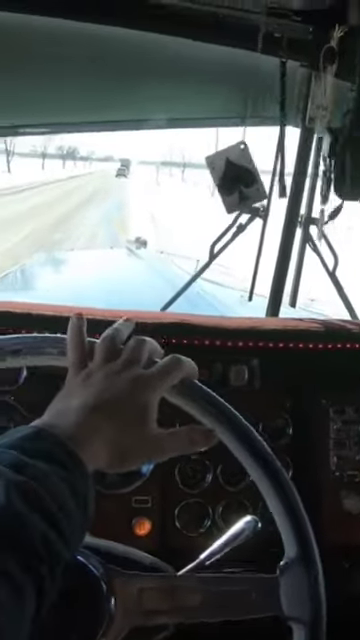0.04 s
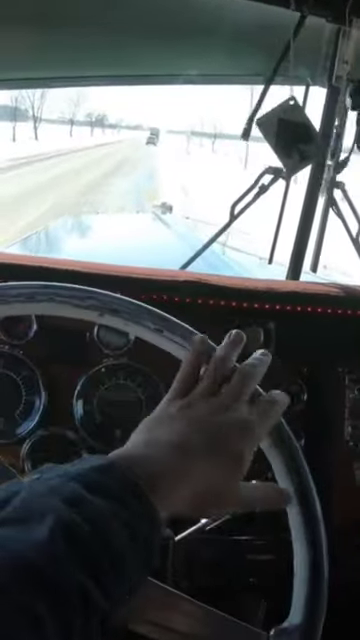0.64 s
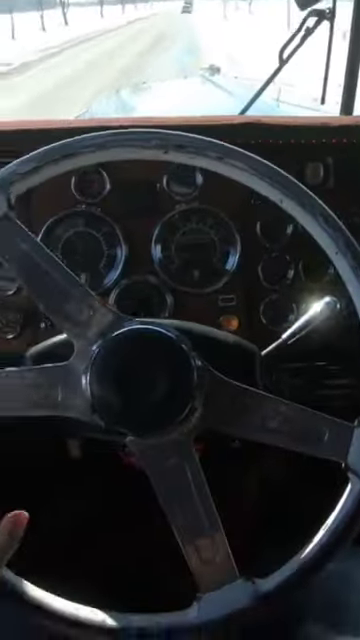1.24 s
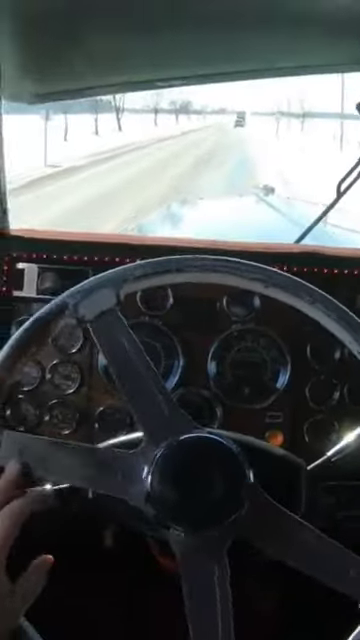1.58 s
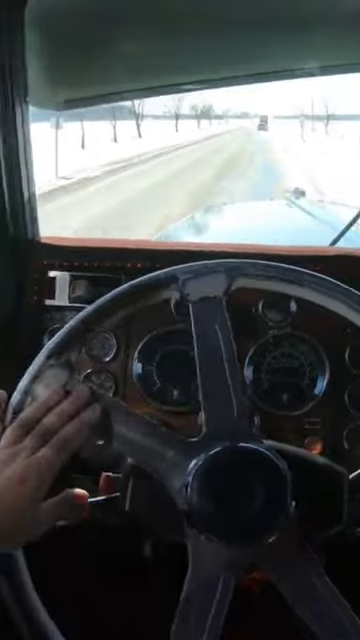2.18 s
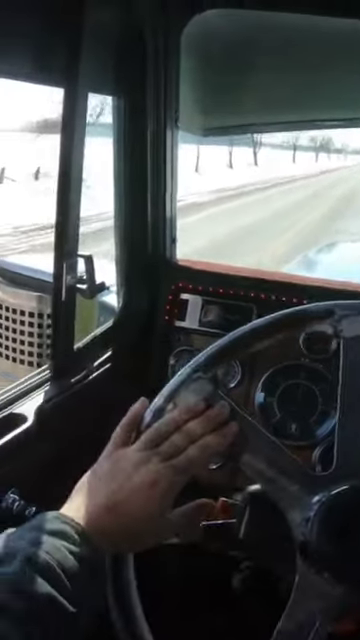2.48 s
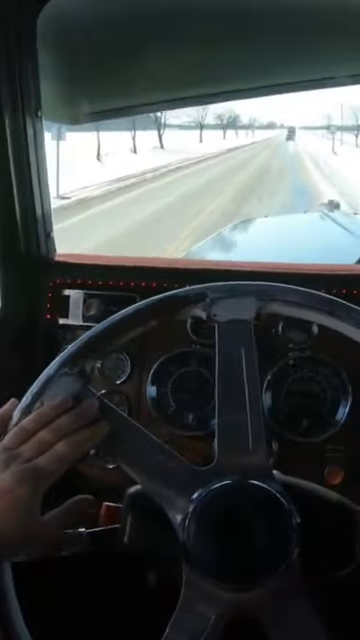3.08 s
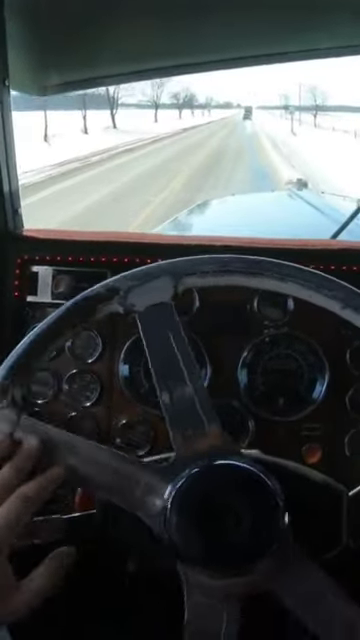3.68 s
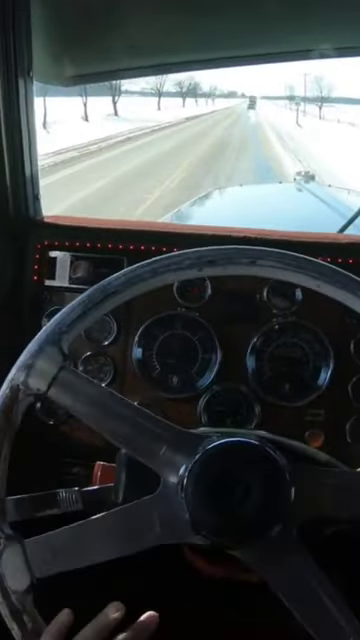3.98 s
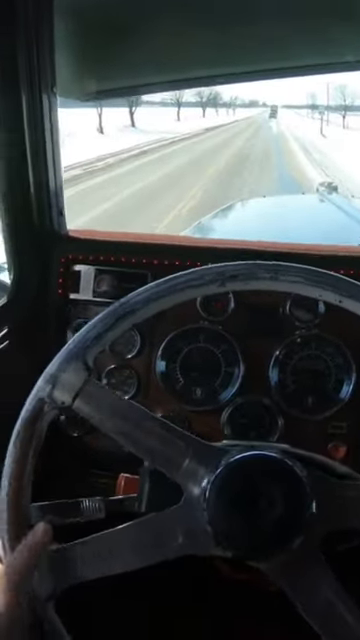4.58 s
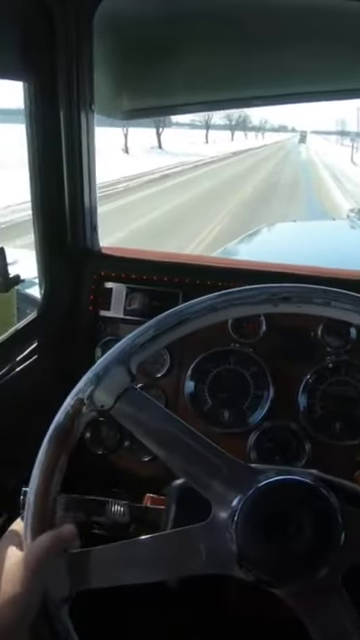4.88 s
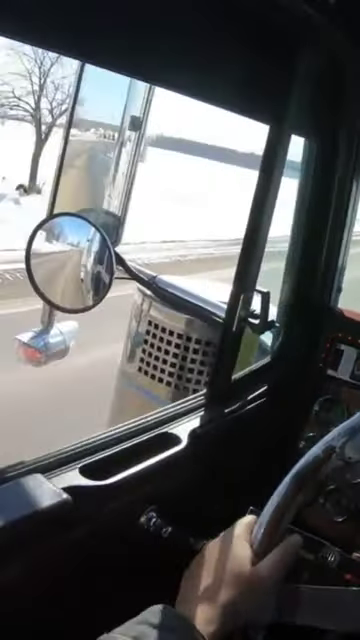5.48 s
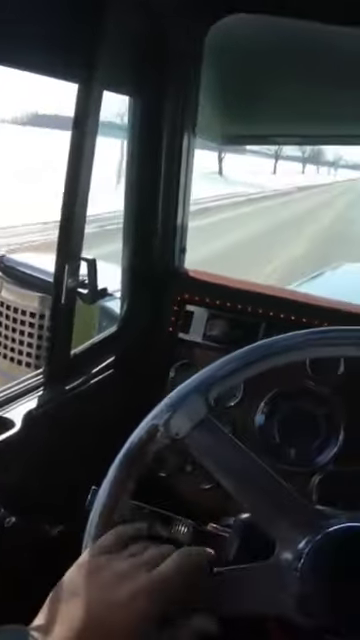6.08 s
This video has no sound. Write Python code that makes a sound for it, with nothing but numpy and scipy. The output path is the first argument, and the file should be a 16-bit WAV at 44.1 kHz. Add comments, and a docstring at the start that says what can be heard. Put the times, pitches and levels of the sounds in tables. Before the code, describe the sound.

Loud, low diesel engine and exhaust drone inside a moving heavy truck, revving, easing off and pulling again with a whistling turbo.

```python
"""Inside the cab of a heavy truck on a winter road, a six-cylinder turbo diesel pulls, runs up,
eases off and pulls again. The exhaust drones at the firing rate, uneven cylinders shake the cab,
and combustion clatters through the firewall, coloured by the resonances of the cab's air and panels.
The turbo whistles over rushing intake air and tyre noise, and loose dash panels buzz.
Something small, perhaps a control lever, clicks once."""
import sys
import numpy as np
from scipy import signal
from scipy.fft import rfft, irfft, next_fast_len
from scipy.io import wavfile
from scipy.ndimage import uniform_filter1d

SR = 44100
rng = np.random.default_rng(int(sys.argv[2]) if len(sys.argv) > 2 else 0)


def transcribe(u):
    """Save the signal u as a 16-bit wav file named by the first command-line argument.

    u: samples, shape (n,) or (channels, n), limited to [-1, 1]; the rate is SR.
    q: integer samples, one column per channel.
    """
    v = np.clip(np.atleast_2d(u).T, -1, 1)
    q = np.round(v * 32767).astype(np.int16)
    wavfile.write(sys.argv[1], SR, q)


N = 279594
TIME = np.arange(N) / SR
PADDED = next_fast_len(N + 8192)
BIN_HZ = np.maximum(np.arange(PADDED // 2 + 1) * SR / PADDED, 1)
CYLINDERS = 6


def from_db(db):
    """Decibels to amplitude ratio."""
    return 10 ** (np.asarray(db) / 20)


def rms_one(x):
    """Normalisation to an rms of 1."""
    return x / np.sqrt(np.mean(x ** 2) + 1e-20)


def in_time(curve):
    """Linear interpolation of a curve at every sample."""
    return np.interp(TIME, *np.transpose(curve))


def at_hz(points, hz):
    """Interpolation on a log-frequency axis."""
    known_hz, values = np.transpose(points)
    return np.interp(np.log(hz), np.log(known_hz), values)


def ramp(x, start, length):
    """Linear rise from 0 to 1."""
    return np.clip((x - start) / length, 0, 1)


def drift(rate_hz, step=40):
    """Low-passed noise: a random fluctuation of rms 1."""
    pole = np.exp(-2 * np.pi * step * rate_hz / SR)
    noise = rng.standard_normal(N // step + 2002)
    slow = signal.lfilter([1], [1, -2 * pole, pole * pole], noise)[2000:]
    return np.interp(np.arange(N) / step, np.arange(len(slow)), rms_one(slow))


def white():
    """Two uncorrelated white noises."""
    return rng.standard_normal((2, N))


def breathy_tone(angle, spread_hz, flicker_hz=92.0):
    """Line broadening: random modulation smears a tone into a narrow hiss at each microphone."""
    ears = [np.cos(angle + 2 * np.pi * np.cumsum(spread_hz * drift(200)) / SR) * drift(flicker_hz)
            for ear in range(2)]
    return rms_one(np.array(ears))


def fluttering_tone(angle):
    """Cab reflections give a tone its own flutter of level and phase at each microphone."""
    ears = [from_db(2.6 * drift(24)) * np.cos(angle + 0.7 * drift(30)) for ear in range(2)]
    return rms_one(np.array(ears))


# Modes of the cab's air and panels. Each row: frequency in Hz, bandwidth in Hz, peak in dB.
CAB_RESONANCES = [(332.6, 12, 2.5), (420, 27, 5), (508, 15, 2.5), (562, 20, 4), (625, 41, 6), (694, 23, 5),
                  (718.6, 29, 5.5), (780, 53, 5.5), (861, 18, 5), (909.4, 26, 5.5), (1051, 30, 4),
                  (1220, 110, 5), (1351, 22, 7.5), (1433, 14, 4.5), (1685, 24, 5), (1896, 54, 4),
                  (2260, 72, 3), (2400, 70, 3.5), (2530, 40, 3), (2680, 45, 3), (2850, 36, 4),
                  (3125, 66, 4.5), (3540, 500, 2.5), (3690, 170, 2.5), (4480, 180, 0.5), (5750, 99, 1),
                  (6520, 280, 2.5)]
CAB_DB = sum(db / (1 + (2 * (BIN_HZ - hz) / width) ** 2) for hz, width, db in CAB_RESONANCES)
# Likeness of the two microphones. Each row: frequency in Hz, correlation before clipping to 0-1.
MIC_CORRELATION = [(30, -3), (150, 0), (300, 1.14), (500, 0.7), (800, 0.5), (1300, 0.3), (2500, 0.42),
                   (4000, 1.1), (6000, 0.07), (10000, .5)]
# Their balance. Each row: frequency in Hz, left minus right in dB.
MIC_BALANCE = [(30, 2.5), (180, 3), (350, 1.5), (700, -2), (1300, 5.5), (2500, 2), (5000, 3), (9000, 1.5)]

def through_cab(pair, spectrum):
    """Source and filter: a spectrum and the cab's modes shape two signals into stereo of mid rms 1."""
    roll_off = (np.minimum(BIN_HZ / spectrum[0][0], 1) * np.minimum(spectrum[-1][0] / BIN_HZ, 1)) ** 4
    mid, side = rfft(pair, PADDED) * from_db(at_hz(spectrum, BIN_HZ) + CAB_DB) * roll_off
    alike = np.clip(at_hz(MIC_CORRELATION, BIN_HZ), 0, 0.999)
    sides = np.array([[1], [-1]])
    ears = np.sqrt(1 + alike) * mid + sides * np.sqrt(1 - alike) * side
    ears *= from_db(sides * at_hz(MIC_BALANCE, BIN_HZ) / 2)
    out = irfft(ears, PADDED)[:, :N]
    return out / out.mean(axis=0).std()


# The driver lifts off the pedal. Each row: lift in seconds, next press in seconds.
PEDAL_LIFTS = [(-1, 0.25), (2.5, 3.4)]

def off_throttle(onset_s, return_s):
    """Lagging response to the pedal: 0 while pulling, ramping to 1 after a lift."""
    return sum(ramp(TIME, lift, onset_s) * (1 - ramp(TIME, press, return_s))
               for lift, press in PEDAL_LIFTS)


def level_from_law(law, revs, boost, released, push_db):
    """Gains multiply, so each part of the engine's state adds its share in dB."""
    lugging_db, revs_db, boost_db, released_db, follows = law
    return lugging_db + revs_db * revs + boost_db * boost + released_db * released + follows * push_db


def cycle_vibration(cycles, fresh, size=4096):
    """Periodic vibration: the block repeats a jagged wave each cycle; a fresh share of power is noise."""
    patterns = irfft(np.exp(2j * np.pi * rng.random((2, size // 2 + 1))))
    repeated = np.array([np.interp(cycles % 1 * size, np.arange(size), p) for p in patterns])
    return np.sqrt(1 - fresh) * rms_one(repeated) + np.sqrt(fresh) * white()


def firing_throb(cycles, depth_db, uneven_db):
    """Amplitude modulation: a swell with each firing, stronger on one side of the crank turn."""
    angle = 2 * np.pi * cycles
    return rms_one(from_db(depth_db * np.cos(CYLINDERS * angle) + uneven_db * np.cos(2 * angle)))


def engine_orders(cycles, firing_hz, orders, response_db, jitter_rad, swell_db):
    """Unequal cylinders excite harmonics of the cycle rate; each swells as it crosses a resonance."""
    out = np.zeros(N)
    for order, level_db in orders:
        cab_db = np.interp(round(order) * firing_hz / CYLINDERS, BIN_HZ, response_db)
        angle = 2 * np.pi * (round(order) * cycles + rng.random()) + jitter_rad * drift(6.6)
        out += from_db(level_db + cab_db + swell_db * drift(2.5)) * np.cos(angle)
    return np.sqrt(2) * out


# Tyre noise. Each row: frequency in Hz, relative spectral density in dB.
TYRE_SPECTRUM = [(150, -2), (290, 4), (360, -4), (440, -0.5), (560, -12.5), (800, -12.5), (1200, -21.5),
                 (2000, -26.5)]

def tyres():
    """Rolling noise: steady, broadband and filtered by the cab."""
    return from_db(-50.5) * through_cab(white(), TYRE_SPECTRUM)


# Road rumble. Each row: frequency in Hz, relative spectral density in dB.
RUMBLE_SPECTRUM = [(8, -14), (15, 2.5), (24, 0.5), (36, -14), (50, -0.5), (70, -2), (115, -8.5),
                   (150, -13.5), (200, -25), (300, -48.5)]

def road_rumble(shake_db):
    """Long waves reach both microphones in phase, so the rumble is a single signal."""
    return from_db(-20.5 + 0.35 * shake_db) * through_cab(white(), RUMBLE_SPECTRUM).mean(axis=0)


# The click. Each row: time in seconds, level in dB.
LEVER_CLICKS = [(4.926, -44)]

def lever(ring_s=0.009):
    """Damped ringing: a bright burst of noise decays exponentially."""
    burst = sum(from_db(db) * (TIME >= s) * np.exp(-np.abs(TIME - s) / ring_s) for s, db in LEVER_CLICKS)
    spectrum = [(2000, 13), (5200, 0.5), (6000, 3), (6600, 14), (7500, -12), (11000, -18), (14000, -24)]
    return burst * through_cab(white(), spectrum)


# Rushing air. Each row: frequency in Hz, relative spectral density in dB.
INTAKE_SPECTRUM = [(900, -5), (1600, -0.5), (2100, -0.5), (2500, -0.5), (3100, -1), (3900, -0.5),
                   (4300, -5.5), (5000, -7), (5900, -2), (6600, -7.5), (7500, -10.5), (8500, -19.5),
                   (10500, -26.5), (14000, -44.5)]
# Its slow swell. Each row: time in seconds, gain in dB.
INTAKE_SWELL = [(0, 2), (2.6, -1.5), (3.2, 1), (3.9, 3), (5.4, -1.6), (5.85, 0), (6.15, -3)]
# Its level in dB: base, then gain at full revs, per octave of boost, off throttle, per dB of push.
INTAKE_LAW = (-59.5, 7.5, 15.5, 5.5, 0.33)

def intake_air(cycles, revs, boost, spun_down, push_db):
    """Flow noise: a broad hiss that grows with turbo speed and pulses faintly with the firings."""
    level_db = level_from_law(INTAKE_LAW, revs * (1 - spun_down), boost, spun_down, push_db)
    flow = white() * firing_throb(cycles, depth_db=0.45, uneven_db=0.5)
    return from_db(level_db + in_time(INTAKE_SWELL)) * through_cab(flow, INTAKE_SPECTRUM)


# The whistle swells and fades. Each row: time in seconds, level in dB.
WHISTLE_LEVEL = [(0, -57), (0.17, -47), (0.32, -67), (1.3, -74), (1.47, -59), (1.53, -64), (1.58, -56),
                 (1.67, -65), (1.75, -51), (1.86, -65), (2.6, -74), (2.8, -62), (3.13, -68), (3.27, -54),
                 (3.37, -62), (3.49, -51), (3.61, -49), (3.74, -63), (3.95, -71), (4.45, -59), (4.55, -61),
                 (4.67, -50), (4.79, -61), (5.1, -70), (5.66, -61), (5.85, -69), (6.12, -58), (6.34, -54)]
# The turbo's two air noises. Each row: frequency in Hz, relative spectral density in dB.
RUN_DOWN_SPECTRUM = [(1900, -13.5), (2250, 1), (2430, 5.5), (2600, -4.5), (2950, -1.5), (3200, -13.5),
                     (3700, -0.5), (4300, -18)]
BOOST_SPECTRUM = [(4500, -5), (6400, 2), (8000, -5), (10500, -15), (14000, -24.5)]

def turbo(whistle_hz, spun_down):
    """Rotor harmonics: a whistle at twice the shaft rate and, off throttle, a whine at three times."""
    level_db = in_time(WHISTLE_LEVEL)
    shaft = np.pi * np.cumsum(whistle_hz + 10 * drift(45)) / SR
    whistle = from_db(level_db) * fluttering_tone(2 * shaft)
    whistle += from_db(-67 + 3 * spun_down) * breathy_tone(2 * shaft, spread_hz=82.0)
    whine = from_db(level_db - 11) * fluttering_tone(3 * shaft)
    whine += from_db(-64) * breathy_tone(3 * shaft, spread_hz=120.0)
    whine *= off_throttle(onset_s=0.38, return_s=0.2)
    hollow_hiss = from_db(-61.5) * spun_down * through_cab(white(), RUN_DOWN_SPECTRUM)
    speed_ratio = whistle_hz / whistle_hz.max()
    high_hiss = from_db(-58 + 105 * np.log10(speed_ratio)) * through_cab(white(), BOOST_SPECTRUM)
    return (whistle + whine + hollow_hiss) * from_db([[1.0], [-1.0]]) + high_hiss


# Loose panels. Each row: pitch in Hz, wander in Hz, dB relative to effort, dB added at full revs.
DASH_PANELS = [(1353, 12, -18.5, 3), (1695, 10, -25, 2.5)]
# A brief harder buzz. Each row: centre in seconds, half-width in seconds, peak level in dB.
DASH_FLARES = [(6.15, 0.069, -46)]
# Rattle of dash and firewall. Each row: frequency in Hz, relative spectral density in dB.
RATTLE_SPECTRUM = [(1050, -11), (1330, -2), (1450, -6), (1750, -5), (2000, -18.5)]

def dash(effort_db, revs, flutter_db=0.5):
    """Forced vibration: loose panels buzz fitfully with the engine and once flare into a rattle."""
    panels = 0
    for hz, wander_hz, level_db, revs_db in DASH_PANELS:
        angle = 2 * np.pi * np.cumsum(hz + wander_hz * drift(5)) / SR
        buzz = breathy_tone(angle, spread_hz=8.0, flicker_hz=20.0)
        panels += from_db(effort_db + level_db + revs_db * revs + flutter_db * drift(3)) * buzz
    flare = sum(from_db(db) * np.exp(-((TIME - s) / width) ** 2) for s, width, db in DASH_FLARES)
    return panels * from_db([[2.0], [-2.0]]) + flare * through_cab(white(), RATTLE_SPECTRUM)


# Tones of the growl. Each row: multiple of the cycle rate, relative level in dB.
GROWL_HARMONICS = [(15, -13), (16, -7), (17, -12), (18, -4.5), (20, -8.5), (21, -19.5), (22, -9), (24, -17),
                   (26, -11), (27, -24.5), (28, -17.5), (30, -17.5), (32, -21.5), (36, -19.5)]
# Its drive in dB: base, then gain at full revs, per octave of boost, off throttle, per dB of push.
GROWL_DRIVE_LAW = (-41, 3.2, 4, 2.5, 1.11)
# Its rough part. Each row: frequency in Hz, relative spectral density in dB.
GROWL_SPECTRUM = [(140, -12.5), (175, -0.5), (230, -4.5), (290, -6), (325, -5.5), (370, -12.5), (440, -9.5),
                  (490, -11.5), (550, -18), (800, -37.5)]

def engine_growl(cycles, firing_hz, revs, boost, released, push_db):
    """Block vibration excites the cab's modes; returns mono harmonics and a rough stereo band."""
    drive_db = level_from_law(GROWL_DRIVE_LAW, revs, boost, released, push_db)
    tones = engine_orders(cycles, firing_hz, GROWL_HARMONICS, CAB_DB, jitter_rad=0.39, swell_db=2.5)
    tones *= from_db(drive_db - 2 - 1.1 * revs - 6.3 * released)
    rough = from_db(drive_db - 7) * through_cab(cycle_vibration(cycles, fresh=0.72), GROWL_SPECTRUM)
    return tones, rough


# The coasting drivetrain. Each row: frequency in Hz, relative spectral density in dB.
DRIVETRAIN_SPECTRUM = [(240, -9.5), (285, 7), (315, 8.5), (375, -23.5), (450, -2), (520, -12)]

def drivetrain(released):
    """Band-limited noise: the drivetrain growls roughly off the throttle."""
    return from_db(-45.5) * released * through_cab(white(), DRIVETRAIN_SPECTRUM)


# Roar under load. Each row: frequency in Hz, relative spectral density in dB.
ROAR_SPECTRUM = [(570, -18.5), (630, -4), (690, -4.5), (780, -2.5), (870, 1.5), (950, -4.5), (1050, -16)]

def load_roar(cycles, effort_db, revs, spun_down, push_db):
    """Vibration modulated at the firing rate: a midrange roar that grows with speed and load."""
    vibration = cycle_vibration(cycles, fresh=0.37) * firing_throb(cycles, depth_db=2.5, uneven_db=1.0)
    level_db = effort_db - 7 + 3.5 * revs ** 2 + 0.3 * push_db - 12 * spun_down ** 2
    return from_db(level_db) * through_cab(vibration, ROAR_SPECTRUM)


# Combustion knock. Each row: frequency in Hz, relative spectral density in dB.
CLATTER_SPECTRUM = [(300, -13.5), (450, -2.5), (540, -6.5), (700, -2), (900, 1), (1000, -3.5), (1150, -7),
                    (1300, -16), (1480, -15), (1750, -17), (2100, -15), (3000, -21), (5000, -38)]

def combustion_clatter(cycles, effort_db, revs, released):
    """Transmission through the firewall: the knocks grow more periodic and brighter with speed."""
    knocks = cycle_vibration(cycles, fresh=0.7 - 0.63 * revs)
    knocks *= firing_throb(cycles, depth_db=1.0, uneven_db=-1.0)
    clatter = from_db(effort_db - 1 - 0.74 * revs - released) * through_cab(knocks, CLATTER_SPECTRUM)
    rattle = from_db(effort_db - 16.5 + 3.6 * revs) * through_cab(knocks, RATTLE_SPECTRUM)
    return clatter + rattle


# Pushes of the uneven cylinders. Each row: multiple of the cycle rate, relative level in dB.
SHAKE_HARMONICS = [(1, -6.5), (2, -7.5), (3, -4), (4, -8), (5, -8.5), (7, -14.5), (8, -9.5), (10, -6),
                   (11, -20), (13, -21), (14, -12)]
# How readily the cab rocks. Each row: frequency in Hz, gain in dB.
ROCKING_RESPONSE = [(20, -6.5), (28, 3), (37, -1), (42, -0.5), (48, 1), (55, 1.5), (68, 0), (88, -3.5),
                    (96, -10), (100, 5.5), (108, 0), (114, -7), (121, 1), (132, 0.5), (150, -2)]

def cab_shake(cycles, firing_hz, shake_db, top_hz=174):
    """Inertia as a low-pass filter: the rocking cab is too heavy to follow the fastest pushes."""
    response_db = at_hz(ROCKING_RESPONSE, BIN_HZ)
    pushes = engine_orders(cycles, firing_hz, SHAKE_HARMONICS, response_db, jitter_rad=0.7, swell_db=2.0)
    return from_db(shake_db + 1) * signal.sosfilt(signal.butter(8, top_hz, fs=SR, output="sos"), pushes)


# Exhaust tones. Each row: multiple of the cycle rate, base level in dB, then dB added
# at full revs under load, off throttle and per dB of push.
EXHAUST_HARMONICS = [(6, -13.5, -1, -10.5, 0.31), (9, -24, 2.5, 11.5, 1), (12, -21, 11, 1.5, 1.05)]
# How the pipe and the cab's air carry them. Each row: frequency in Hz, gain in dB.
BOOM_RESPONSE = [(57, -0.3), (68, 0.4), (71, -1.2), (75, -12.5), (80, -5.5), (89, -10), (98, -3.5),
                 (108, -8.5), (113, -8), (117, -2.5), (120, 0.6), (127, -1.5), (134, -6), (146, -11),
                 (158, -21.5)]

def exhaust(cycles, firing_hz, revs, push_db, pipe_hz=67.2, pipe_width_hz=15.0, stumble_db=3.0):
    """Driven resonance: three tones swell and fade with speed; two lag as firing passes pipe_hz."""
    emptied = off_throttle(onset_s=0.6, return_s=0.15)   # exhaust pressure falls slowly after a lift
    gains = []
    for order, base_db, revs_db, released_db, follows in EXHAUST_HARMONICS:
        drive_db = base_db + revs_db * revs * (1 - emptied) + released_db * emptied + follows * push_db
        gains.append(from_db(drive_db + at_hz(BOOM_RESPONSE, round(order) * firing_hz / CYLINDERS)))
    fundamental, fifth, octave = gains
    angle = 2 * np.pi * CYLINDERS * cycles
    lag = np.arctan(2 * (firing_hz - pipe_hz) / pipe_width_hz) + np.pi / 4
    tones = fundamental * np.cos(angle - lag)
    # the middle tone swings between the firings, so the chugs stay equally strong
    tones += fifth * np.sin(1.5 * (angle - lag / 2))
    tones += octave * np.cos(2 * angle) * (1 + 0.2 * drift(5.5))
    stumble = from_db(stumble_db * emptied * (drift(9.4) - 0.5))   # without fuel the chug is uneven
    return np.sqrt(2) * tones * stumble


# Engine speed. Each row: time in seconds, firing rate in Hz.
FIRING_RATE = [(0.0, 65.8), (0.25, 59.4), (0.65, 61.6), (0.91, 60.2), (1.38, 67.5), (1.9, 72.5),
               (2.3, 78.0), (2.61, 80.3), (3.0, 71.0), (3.47, 58.8), (3.74, 62.2), (4.01, 56.4),
               (4.31, 64.0), (4.61, 61.2), (4.85, 68.0), (5.13, 67.0), (5.4, 72.2), (5.64, 72.5),
               (5.85, 76.4), (6.34, 79.5)]
# Turbo speed. Each row: time in seconds, whistle pitch in Hz.
WHISTLE_PITCH = [(0.0, 3850), (0.13, 3785), (0.23, 3705), (0.51, 3520), (1.23, 3555), (1.47, 3740),
                 (2.33, 4485), (2.62, 4590), (2.87, 4305), (3.05, 4150), (3.57, 3736), (3.7, 3655),
                 (4.0, 3590), (4.45, 3720), (4.67, 3828), (4.82, 3983), (5.35, 4465), (5.68, 4710),
                 (6.04, 5080), (6.34, 5300)]
# Strength of combustion and of the cab's shaking. Each row: time in seconds, relative level in dB.
ENGINE_EFFORT = [(0, -45.5), (0.2, -54), (0.28, -43.5), (0.48, -41), (0.8, -47.5), (1.6, -45), (2.1, -40.5),
                 (2.6, -40), (2.75, -49.5), (3.4, -54), (3.46, -46.5), (3.52, -41.5), (3.66, -42.5),
                 (3.98, -47.5), (4.27, -44), (4.58, -47), (5.25, -46.5), (5.6, -42), (6.34, -41)]
SHAKE_LEVEL = [(0, -30.5), (0.12, -22), (0.3, -31), (0.8, -33.5), (1.2, -33), (1.4, -21), (1.7, -24),
               (1.92, -21), (2.5, -20), (2.85, -19), (3.3, -24.5), (3.7, -28.5), (4.05, -31), (4.4, -34.5),
               (4.9, -31.5), (5.25, -31.5), (5.45, -17.5), (6.34, -22)]

def scene(lugging_hz=61.3, wound_up_hz=79.5):
    """Superposition at the driver's seat: one engine speed ties the engine's sources together."""
    firing_hz, whistle_hz = in_time(FIRING_RATE), in_time(WHISTLE_PITCH)
    effort_db, shake_db = in_time(ENGINE_EFFORT), in_time(SHAKE_LEVEL)
    released = off_throttle(onset_s=0.24, return_s=0.15)   # the fuel is cut and comes back
    spun_down = off_throttle(onset_s=0.56, return_s=0.35)   # the turbo answers more slowly
    cycles = np.cumsum(firing_hz) / SR / CYLINDERS   # count of four-stroke cycles
    revs = ramp(firing_hz, lugging_hz, wound_up_hz - lugging_hz)
    boost = np.log2(whistle_hz / 3700)   # octaves above the pitch with no boost
    steady_db = -46.5 + 4 * revs
    push_db = np.maximum(effort_db - steady_db, 0.5)   # effort beyond that of a steady pedal

    boom = exhaust(cycles, firing_hz, revs, push_db) + cab_shake(cycles, firing_hz, shake_db)
    growl_tones, growl = engine_growl(cycles, firing_hz, revs, boost, released, push_db)
    growl += drivetrain(released)
    clatter = combustion_clatter(cycles, effort_db, revs, released)
    roar = load_roar(cycles, effort_db, revs, spun_down, push_db)
    buzz = dash(effort_db, revs)
    air = intake_air(cycles, revs, boost, spun_down, push_db)
    bass = (boom + growl_tones + road_rumble(shake_db)) * from_db([[0.6], [-0.6]])
    return bass + growl + clatter + roar + buzz + air + tyres() + turbo(whistle_hz, spun_down) + lever()


def record(dry, threshold=0.41, release_db_per_s=100.5, split_hz=230.0, treble_share=0.3, stop_hz=14500):
    """Two-band limiting holds the boom down and ducks the rest a little; the ends fade, the top is cut."""
    over_db = np.maximum(20 * np.log10(np.abs(dry).max(axis=0) / threshold + 1e-9), 0)
    held_db = np.maximum.accumulate(over_db + release_db_per_s * TIME) - release_db_per_s * TIME
    held_db = uniform_filter1d(uniform_filter1d(held_db, size=200), size=200)
    bass = signal.sosfiltfilt(signal.butter(2, split_hz, fs=SR, output="sos"), dry)
    limited = bass * from_db(-held_db) + (dry - bass) * from_db(-treble_share * held_db)
    fade = np.sin(np.pi / 2 * ramp(np.minimum(TIME, TIME[::-1]), 0, 0.004)) ** 2
    return signal.sosfilt(signal.cheby2(12, 70, stop_hz, fs=SR, output="sos"), fade * limited)


dry = scene()
out = record(dry)
transcribe(out)
```